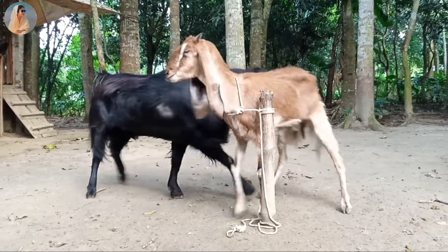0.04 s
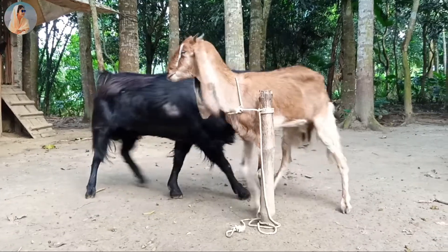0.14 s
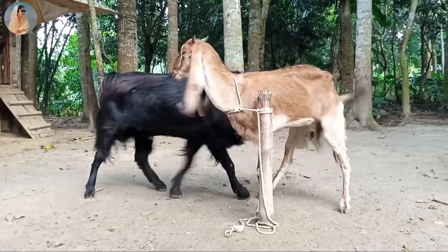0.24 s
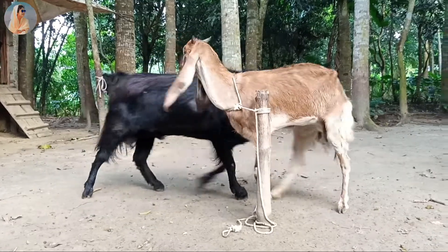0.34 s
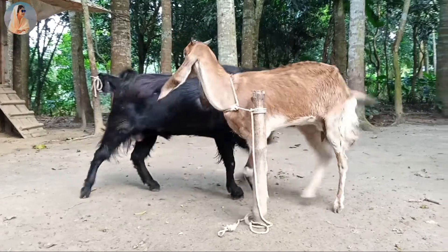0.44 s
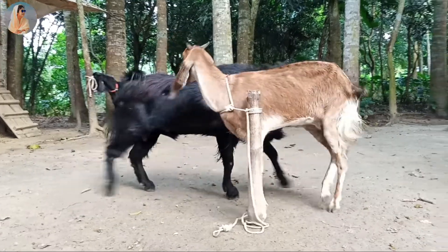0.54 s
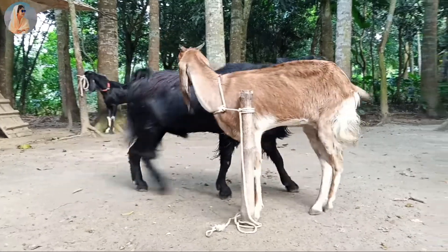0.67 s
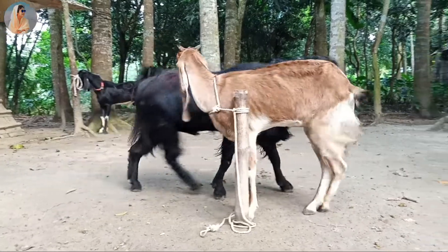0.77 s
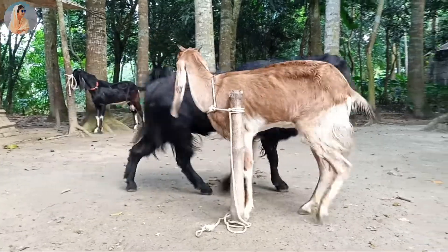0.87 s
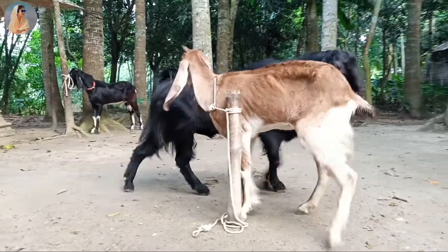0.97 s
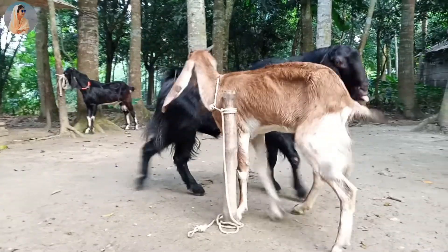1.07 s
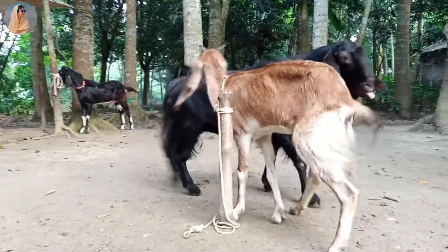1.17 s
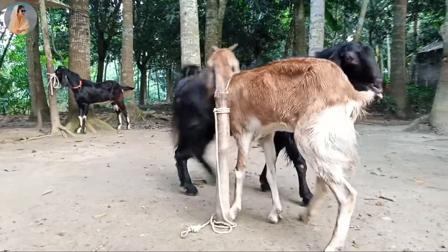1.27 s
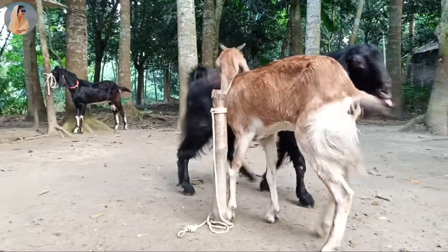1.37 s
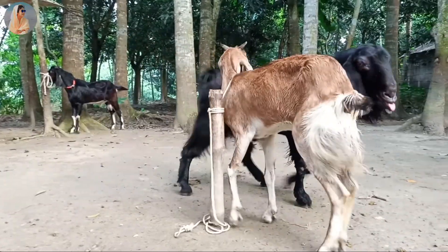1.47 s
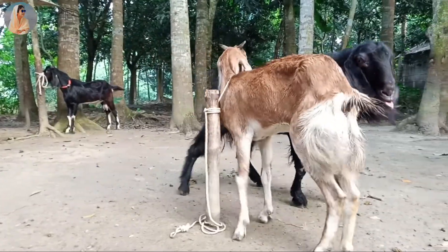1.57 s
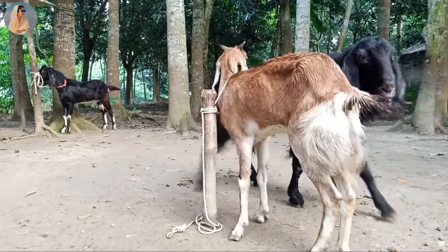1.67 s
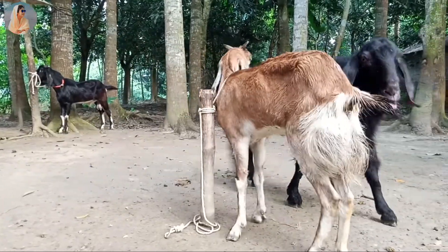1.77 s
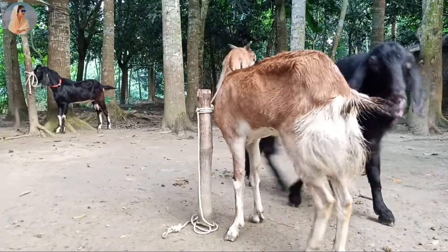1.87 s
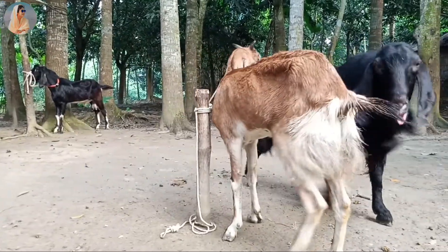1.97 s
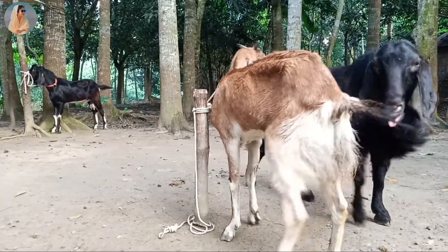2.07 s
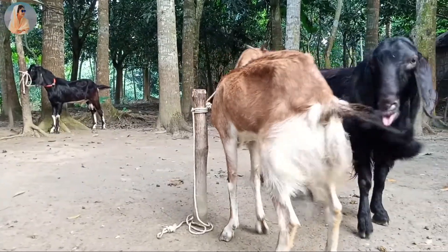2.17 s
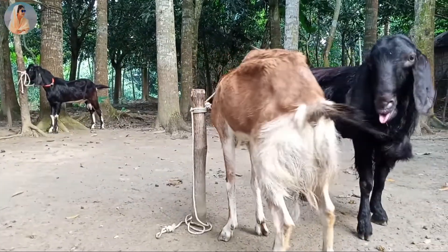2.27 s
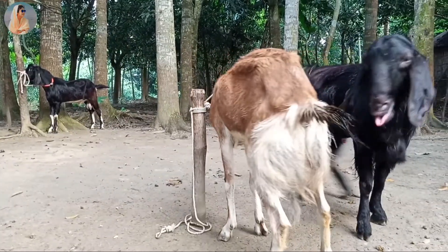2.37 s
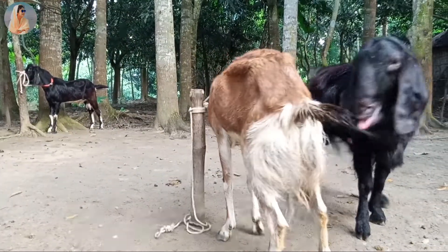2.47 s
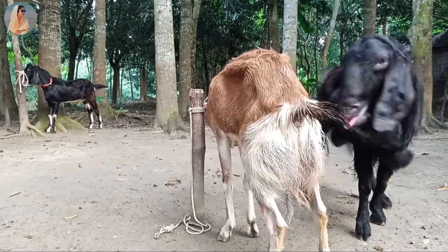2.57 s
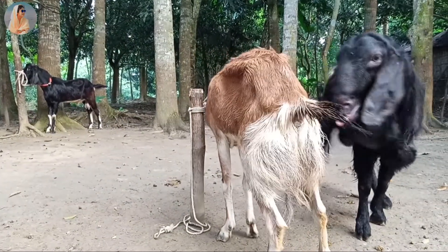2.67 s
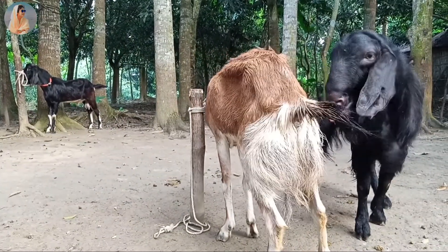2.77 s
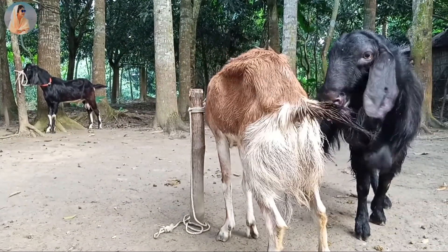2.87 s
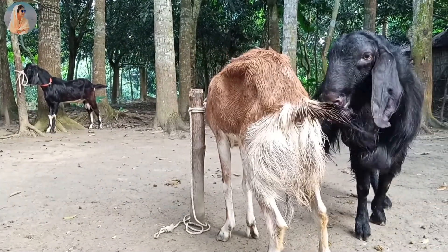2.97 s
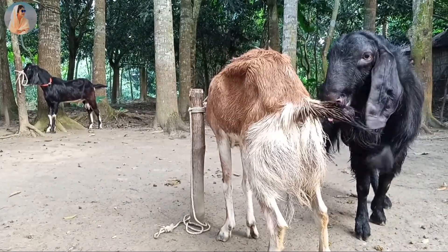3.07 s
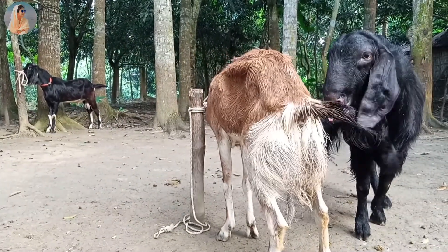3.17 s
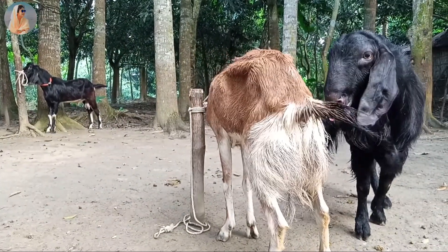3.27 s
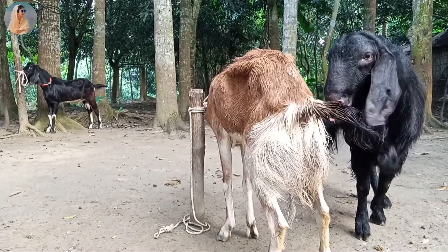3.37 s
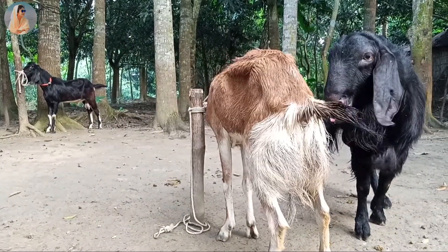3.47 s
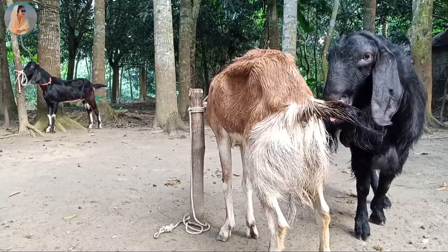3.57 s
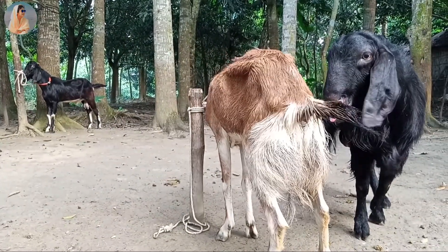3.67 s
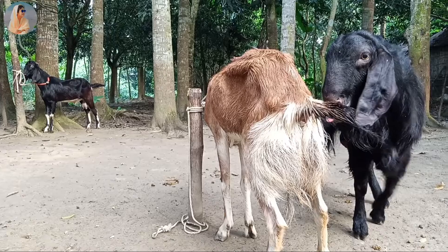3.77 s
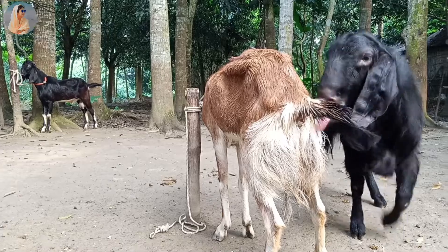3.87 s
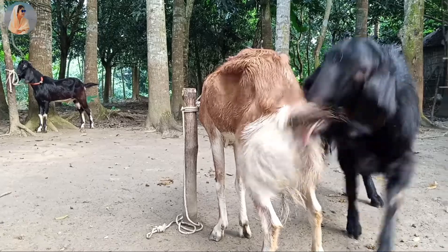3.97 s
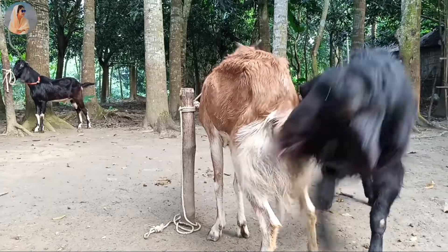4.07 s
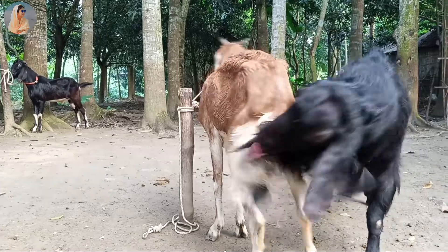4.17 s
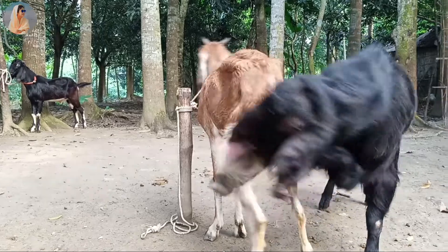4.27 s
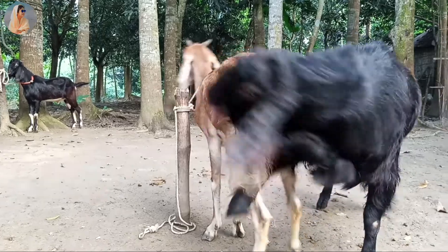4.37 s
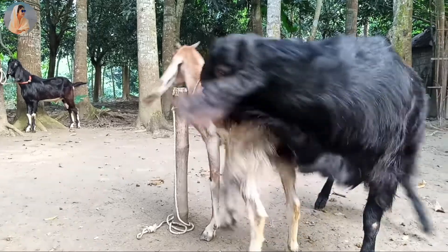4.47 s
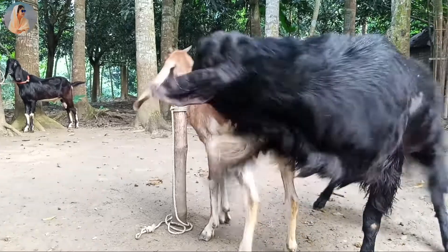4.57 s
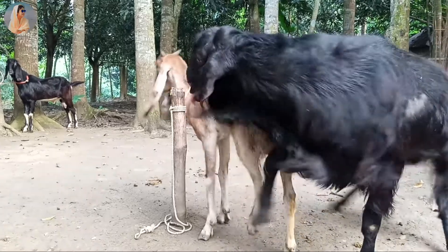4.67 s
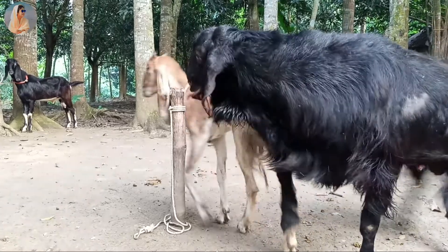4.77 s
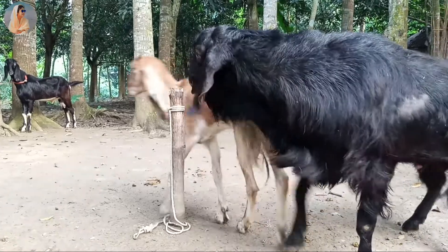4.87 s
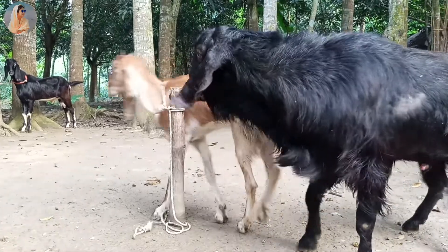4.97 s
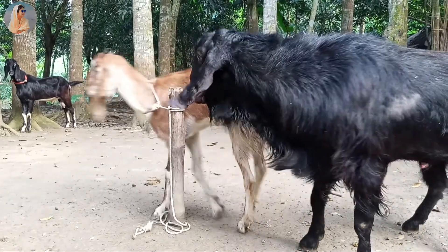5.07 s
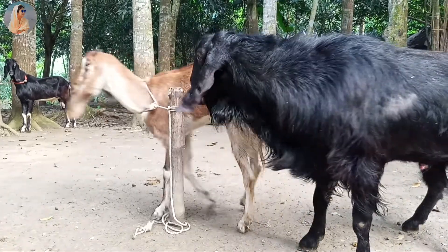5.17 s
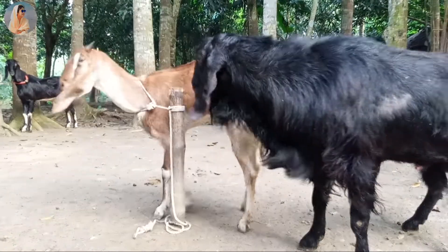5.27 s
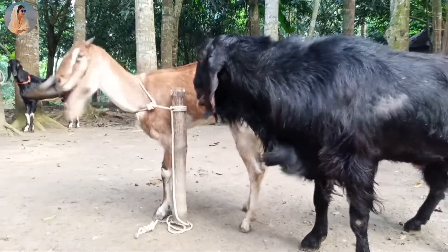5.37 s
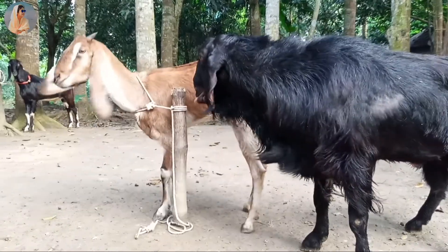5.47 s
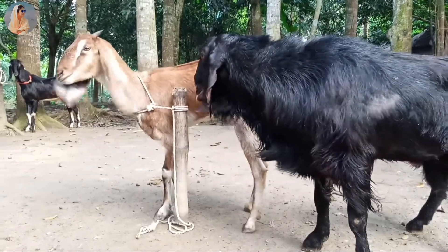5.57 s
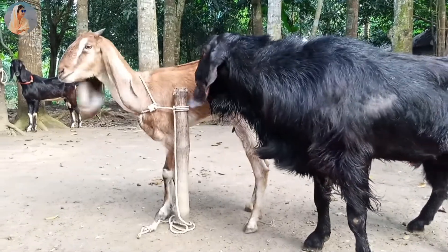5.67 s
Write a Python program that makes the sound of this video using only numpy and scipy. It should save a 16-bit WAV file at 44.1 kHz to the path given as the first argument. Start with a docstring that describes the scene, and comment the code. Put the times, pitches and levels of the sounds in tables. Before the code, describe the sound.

An open earth yard among trees, heard from close to a buck goat. Faint distant air, a low lumpy breeze and a thin steady insect hiss lie underneath, while small birds whistle short downward slurs throughout, with a cluster of lower notes and coos around 0.8-1.3 s. Hooves tick sharply on grit at 0.36 and 1.44 s, scuff at 0.85 and 1.3, and thud near 1.95. The buck snorts softly at 1.0, more strongly at 1.3 and 2.65, then again at 3.05 with a hissing sniff. A longer sniff builds from 3.4 to 3.8 with a faint two-toned nasal wheeze. After a puff and stamping at 4.0-4.2, he blurts a loud, low, wet, blubbering bleat from 4.1 to 4.6, its three strongest pulses between 4.24 and 4.47, closing into a muffled hum. A soft huff follows at 4.7; then light gritty ticks and birdsong until 5.7.

```python
"""An earth yard among trees, where a buck courts a doe close to the microphone.
He snorts and sniffs: noise through nostril resonances. Then he bleats a few short, blubbering
syllables: loose flaps popping the mouth, a chest hum and a throat rung by wet slaps.
Hooves tick, thud and scuff as bursts of noise and grains; small birds whistle on gliding sines.
Behind them lie patchy air, a lumpy breeze and the thin treble of insects, all shaped from noise."""
import sys
import numpy as np
from scipy import signal
from scipy.fft import rfft, irfft
from scipy.io import wavfile
from scipy.ndimage import uniform_filter1d

SR = 44100
rng = np.random.default_rng(int(sys.argv[2]) if len(sys.argv) > 2 else 0)


def int16_out(signal):
    """Quantize to a 16-bit WAV file."""
    q = np.round(np.clip(np.atleast_2d(signal).T, -1, 1) * 32767)
    wavfile.write(sys.argv[1], SR, q.astype(np.int16))


N = 252693
TIME = np.arange(N) / SR


def amp(db):
    """Decibels to gain."""
    return 10 ** (np.asarray(db) / 20)


def unit(x):
    """Scales to rms 1."""
    return x / np.sqrt(np.mean(x ** 2) + 1e-20)


def read(points, hz):
    """Reads a curve of (Hz, value) points on a log-frequency axis."""
    f, value = np.transpose(points)
    return np.interp(np.log(hz + 1), np.log(f + 1), value)


def add(mix, s, sound):
    """Mixes a sound in at s seconds."""
    part = mix[max(round(s * SR), 0):][:len(sound)]
    part += sound[:len(part)]


def colour(x, points):
    """Gives x a spectrum, at rms 1."""
    gain = amp(read(points, np.fft.rfftfreq(len(x), 1 / SR)))
    return unit(irfft(rfft(x) * gain, len(x)))


def drift(size, hz):
    """Random wander of rms 1 that fades out above hz; it repeats each second."""
    rolloff = 1 + (np.fft.rfftfreq(SR, 1 / SR) / hz) ** 4
    wander = unit(irfft(rfft(rng.standard_normal(SR)) / rolloff, SR))
    return wander[np.arange(size) % SR]


def resonate(x, hz, width):
    """A resonance of gain 1 that can follow a pitch curve: x is turned down to 0 Hz, smoothed, turned back."""
    turn = np.exp(2j * np.pi * np.cumsum(hz * np.ones(len(x))) / SR)
    r = np.exp(-np.pi * width / SR)
    return 2 * (turn * signal.lfilter([1 - r], [1, -r], x / turn + 1e-18)).real


def through(x, modes):
    """Passes x through side-by-side resonances, each doubled to steepen its skirts."""
    return sum(amp(db) * resonate(resonate(x, hz, 0.89 * width), hz, 0.81 * width)
               for hz, width, db in modes)


def band(x, hz, spread, order=2):
    """Band-pass from hz / spread to hz * spread."""
    sos = signal.butter(order, [hz / spread, hz * spread], "band", fs=SR, output="sos")
    return signal.sosfilt(sos, x)


def swell(start, rise, fall):
    """A firm start that rounds off at full strength, then a bell-shaped fall."""
    t = TIME - start
    attack = np.sin(np.pi / 2 * np.clip(t / rise, 0, 1)) ** 0.94
    return attack * np.exp(-(np.maximum(t - rise, 0) / fall) ** 2)


def knocks(rows, spread):
    """Each contact is a burst of band-passed noise with a quick onset and an exponential decay."""
    out, t = np.zeros(N), np.arange(SR // 3) / SR
    for s, db, hz, decay in rows:
        burst = unit(band(rng.standard_normal(len(t)), hz, spread))
        add(out, s, amp(db) * burst * np.exp(-t / decay) * (1 - np.exp(-t * hz)))
    return out


def distant_air():
    """A faint wash from afar: coloured noise whose level is patchy in both time and pitch."""
    # Spectrum of the wash. Each row: frequency in Hz, relative level in dB.
    air_colour = [(18, -51.5), (30, 4.5), (98, 4), (508, -6.5), (928, -6), (2320, -16), (3530, -12.5),
                  (4350, -7.5), (7350, -20), (8160, -12), (9060, -20.5), (10300, -19.5), (11800, -28.5),
                  (13400, -22.5), (15700, -24)]
    hz, _, z = signal.stft(colour(rng.standard_normal(N), air_colour), SR, nperseg=2048, noverlap=1536)
    patches = uniform_filter1d(rng.standard_normal(z.shape), size=5, axis=0)
    patches = unit(uniform_filter1d(patches, size=10, axis=1))
    # Depth of the patches: (Hz, dB)
    depth_db = read([(100, 4.4), (500, 5.3), (2500, 7.06), (7000, 4.9), (12000, 2.6)], hz)[:, None]
    patchy = signal.istft(z * amp(depth_db * patches), SR, nperseg=2048, noverlap=1536)[1][:N]
    return amp(-65) * unit(patchy) * amp(1.3 * drift(N, 6))


def breeze():
    """A low rumble of band-passed noise: a slow swell with random lumps."""
    # The slow swell before the lumps. Each row: time in seconds, level in dB.
    breeze_level = [(0, -73.5), (.9, -69.5), (2.1, -76.5), (3.4, -79.5), (4.3, -67.5), (5.73, -83.5)]
    gust_db, gust_hz = -6, 2.1  # depth of the lumps, and the rate above which they fade out
    rumble = unit(band(rng.standard_normal(N), 115, 1.735, order=3))
    return rumble * amp(np.interp(TIME, *np.transpose(breeze_level)) + gust_db * drift(N, gust_hz))


def insects():
    """Steady narrow bands of noise in the treble, and a higher one whose level flickers unevenly."""
    # The steady bands. Each row: centre in Hz, width in Hz of each of two passes, level in dB.
    insect_bands = [(8060, 43.9, -71.5), (8180, 75, -74.5), (8410, 123.4, -75.5)]
    rasper_hz, rasper_width_hz, rasper_db = 10160, 1400, -77
    pulse_db, pulse_hz = 3, 45  # depth of the flicker, and the rate above which it fades out
    trill = np.zeros(N)
    for hz, width, db in insect_bands:
        trill += amp(db) * unit(resonate(resonate(rng.standard_normal(N), hz, width), hz, width))
    rasper = through(rng.standard_normal(N), [(rasper_hz, rasper_width_hz, 0)])
    return trill + amp(rasper_db) * unit(rasper * amp(pulse_db * drift(N, pulse_hz)))


def grove():
    """The backdrop: distant air, breeze and insects, all filtered noise."""
    return distant_air() + breeze() + insects()


def hooves():
    """Snaps, thuds and clumped, grainy scuffs on dry earth."""
    # Hooves and bodies thudding. Each row: start in seconds, relative level in dB, centre in Hz,
    # decay in seconds.
    thuds = [(.03, -77.5, 730, 0.057), (.235, -55, 244, 0.0049), (1.045, -55.5, 1320, 0.0067),
             (1.36, -62.5, 126, 0.03), (1.86, -60.5, 99, 0.024), (1.955, -46.5, 117, 0.0053),
             (2.225, -61.5, 90, 0.026), (2.68, -67.5, 135, 0.045), (3.755, -66.5, 404, 0.011),
             (4.075, -61, 1290, 0.0068), (4.152, -49, 118, 0.016), (4.21, -56.5, 114, 0.023),
             (4.172, -49, 443, 0.0048)]
    # Hooves dragged over grit. Each row: start in seconds, rise and fall in seconds, level in dB.
    scuffs = [(.84, 0.088, 0.23, -62), (1.31, 0.11, 0.21, -56), (1.983, 0.0031, 0.034, -54),
              (2.1, 0.051, 0.28, -67.5), (2.71, 0.023, 0.39, -64.5), (4.03, 0.041, 0.039, -59.5),
              (4.45, 0.026, 0.094, -56), (4.68, .14, 0.034, -59)]
    # Spectrum of the scuffs. Each row: frequency in Hz, relative level in dB.
    scuff_colour = [(180, -44), (400, -26), (1000, -2.5), (1850, -0.5), (2820, -5.5), (4120, 0.5),
                    (6500, -6), (10000, -14), (12500, -19.5), (15000, -22)]
    # Snaps of grit and twigs under hooves. Each row: start in seconds, relative level in dB, centre in Hz.
    ticks = [(0.3553, -38.5, 6640), (0.61, -48, 10000), (1.439, -33.5, 6400), (1.487, -58, 6800),
             (1.986, -38, 5800), (2.136, -44, 4470), (2.743, -40, 8400), (3.8772, -42, 6860),
             (3.9608, -41.5, 7000), (4.1123, -40.5, 6800), (4.579, -40, 7630), (4.833, -40, 9000),
             (4.903, -43, 7500), (5.2015, -37.5, 7760)]
    tick_decay_s = 0.003
    grains = (rng.random(N) < 900 / SR) * rng.choice([-1., 1.], N)  # about 900 a second
    grains = grains * amp(2.1 * np.minimum(rng.exponential(1, N), 4))
    grit = (grains + 0.28 * rng.standard_normal(N)) * amp(2.74 * drift(N, 32.04))
    drag = sum(amp(db) * swell(start, rise, fall) for start, rise, fall, db in scuffs)
    snaps = [(s, db, hz, tick_decay_s) for s, db, hz in ticks]
    return amp(13.5) * knocks(thuds, 1.35) + colour(grit, scuff_colour) * drag + amp(-5) * knocks(snaps, 1.7)


def tone(hz, flutter):
    """A fluttering whistle along a pitch curve, uneven in strength."""
    phase = 2 * np.pi * np.cumsum(hz * (1 + flutter * drift(len(hz), 260))) / SR
    return unit(amp(3.9 * drift(len(hz), 45)) * np.sin(phase))


def slur(s, db, hz, glide, drop, flutter):
    """A whistle with a soft held start, then a fall that begins at s and gains a buzz."""
    hold_s, fall_s = .11, .09
    buzz = .04  # flutter gained during the fall, as a share of the pitch
    t = np.arange(-hold_s, fall_s, 1 / SR)
    held, fallen = np.maximum(-t / hold_s, 0), np.maximum(t / fall_s, 0)
    pitch = 1 - glide * held - drop * fallen ** 0.82
    shape = amp(-11 * held ** 0.98 - 11 * fallen ** 2) * signal.windows.tukey(len(t), .2)
    return s + t[0], amp(db) * shape * tone(hz * pitch, flutter + buzz * fallen)


def note(s, db, hz, length, glide, flutter):
    """A short note that glides up or down from hz."""
    u = np.linspace(0, 1, round(length * SR))
    return s, amp(db) * signal.windows.tukey(len(u), .4) * tone(hz * (1 + glide * u), flutter)


def birds():
    """Overlapping whistles and notes; the more a call flutters, the more leaves and trunks smear it."""
    # Down-slurred whistles of small birds. Each row: start of the fall in seconds, relative level in dB,
    # pitch there in Hz, then as shares of that pitch: glide while held, drop, flutter.
    whistles = [(0.229, -61.5, 4250, .03, 0.15, 0.051), (0.399, -66, 3710, -.04, 0.27, 0.047),
                (.55, -61.5, 4236, .03, 0.16, 0.055), (.66, -71, 3760, -.02, 0.28, 0.0494),
                (1.092, -60.5, 4990, -.04, 0.27, .04), (1.7, -62.5, 5100, -.02, 0.21, 0.0079),
                (1.798, -65.5, 4520, 0, .2, 0.056), (2.118, -60, 4840, -.02, 0.12, 0.043),
                (2.2, -65, 4190, -.04, 0.14, .04), (2.42, -67, 4170, -0.045, 0.09, .011),
                (2.535, -60, 5170, .035, 0.16, 0.0077), (2.75, -60, 4280, -.03, 0.2, 0.05),
                (2.95, -56.5, 5200, .035, 0.14, 0.013), (3.08, -60.5, 4460, -.04, .22, 0.0095),
                (3.387, -57, 5200, 0, 0.17, 0.0096), (3.47, -64, 4370, -.06, .14, 0.0094),
                (3.851, -68, 4330, .02, 0.15, 0.0089), (3.941, -55, 5270, .01, .2, 0.0089),
                (4.48, -60, 5140, .02, .2, 0.027), (4.901, -67.5, 5020, 0, 0.19, 0.018),
                (5, -62, 5360, 0, 0.21, 0.019), (5.114, -64, 4200, -.14, 0.18, 0.0078),
                (5.365, -61, 4880, -.05, 0.19, 0.0087), (5.346, -62, 4600, 0, 0.21, 0.0058),
                (5.665, -62, 4520, -.035, 0.22, 0.0085)]
    # Short bird notes and coos; those near 3.1 kHz answer the lower whistles.
    # Each row: start in seconds, relative level in dB, first pitch in Hz, length in seconds,
    # then as shares of the pitch: glide, flutter.
    notes = [(0.346, -69, 3180, 0.14, -0.12, 0.044), (.68, -68, 3160, 0.096, -0.072, 0.05),
             (0.771, -60, 3896, 0.13, 0.16, 0.075), (0.873, -59.5, 6490, 0.1, -0.013, 0.013),
             (.87, -64, 1900, 0.095, -0.029, 0.011), (0.876, -61, 3880, 0.087, -0.051, 0.03),
             (.93, -66, 500.6, .22, -0.043, 0.047), (0.995, -68.5, 3005, 0.11, -0.016, 0.048),
             (1.11, -63, 1486, 0.13, -0.022, 0.0081), (1.116, -65.5, 2000, 0.088, -0.073, 0.046),
             (1.109, -66.5, 956, 0.053, -0.054, 0.036), (1.208, -66, 1155, 0.12, -0.13, 0.024),
             (1.24, -63.5, 501, 0.093, -0.0078, 0.012), (1.268, -63.5, 2614, 0.108, -0.034, 0.017),
             (1.569, -66.5, 6500, 0.031, -0.034, 0.016), (1.667, -66.5, 3110, 0.09, .02, 0.027),
             (2.029, -68, 3190, 0.072, -0.02, 0.034), (2.919, -60, 5730, 0.043, 0.0066, 0.01),
             (4.99, -64, 6090, 0.03, -0.03, .01), (5.38, -71, 3190, 0.13, 0.079, 0.03)]
    clear, hazy = np.zeros(N), np.zeros(N)
    for voice, rows in ((slur, whistles), (note, notes)):
        for row in rows:
            s, call = voice(*row)
            flutter = row[-1]
            haze = np.clip(flutter / 0.025, 0, .8)  # share of the call's power that is smeared
            add(clear, s, np.sqrt(1 - haze) * call)
            add(hazy, s, np.sqrt(haze) * call)
    return clear + amp(0.5) * nearby(hazy, decay=0.029)


def snorts():
    """Fluttering air through the buck's nostrils, whose resonance moves and broadens as they tighten."""
    # Each row: start in seconds, rise and fall in seconds, relative level in dB,
    # nostril resonance in Hz when slack, then when tight.
    snort_rows = [(.981, 0.032, 0.063, -54, 1100, 1420), (1.264, 0.099, 0.076, -46.5, 1350, 1840),
                  (2.625, 0.064, 0.089, -46, 1324, 1885), (3.038, 0.089, 0.039, -51.5, 1370, 1625),
                  (3.45, 0.07, 0.064, -61.5, 1460, 1760), (3.8, 0.087, 0.1, -57.5, 1770, 1780)]
    # Narrow fixed resonances that streak the snort, as a bounce off the ground would,
    # lit as the nostril resonance sweeps past.
    # Each row: centre in Hz, width setting in Hz, relative level in dB.
    streaks = [(1422, 40, 3), (1679, 79, -1), (1835, 56, 5.5), (2020, 43, -2.5), (2305, 34, 4)]
    streaks_db = -3  # against the plain rush of air
    tighten_s = .11
    slack_width_hz, tight_width_hz = 230, 580  # width settings: broader as the air speeds up
    out = np.zeros(N)
    for start, rise, fall, db, slack_hz, tight_hz in snort_rows:
        part = slice(round(start * SR), round((start + 0.47) * SR))
        tight = np.clip((TIME[part] - start) / tighten_s, 0, 1)
        hz = slack_hz + (tight_hz - slack_hz) * tight
        air = rng.standard_normal(len(hz)) * amp(0.83 * drift(len(hz), 73))
        slack_jet = unit(through(air, [(hz, slack_width_hz, 0)]))
        tight_jet = unit(through(air, [(hz, tight_width_hz, 0)]))
        jet = (1 - tight) * slack_jet + tight * tight_jet
        streaked = unit(band(jet, 1810, 1.6, order=3)) + amp(streaks_db) * unit(through(jet, streaks))
        steady = streaked / np.sqrt(uniform_filter1d(streaked ** 2, SR // 20))  # even out the level over 50 ms
        out[part] += amp(db) * steady * swell(start, rise, fall)[part]
    return out


def sniffs():
    """Long hissing sniffs: unsteady air through fixed resonances of the nose."""
    # Each row: start in seconds, rise and fall in seconds, relative level in dB.
    sniff_rows = [(3.037, 0.12, 0.058, -56.5), (3.42, 0.37, 0.081, -57.5)]
    # One set of nose resonances a sniff. Each row: centre in Hz, width setting in Hz, relative level in dB.
    nose_modes = [
        [(3170, 420, 1.5), (4370, 1400, -4.5), (5620, 610, 1.5), (6370, 450, 0.5), (8600, 2000, -9.5)],
        [(4277, 100, -7.5), (5400, 1050, -11.5), (6800, 110, -13.5)],
    ]
    out = np.zeros(N)
    for (start, rise, fall, db), modes in zip(sniff_rows, nose_modes):
        part = slice(round(start * SR), round((start + 1.1) * SR))
        air = rng.standard_normal(len(TIME[part]))
        hiss = amp(db + 2 * drift(len(air), 30)) * unit(through(air, modes))
        out[part] += hiss * swell(start, rise, fall)[part]
    return out


def wheeze():
    """Two breathy, unsteady tones that sing in the nose during the long sniff: noise in narrow resonances."""
    # Each row: time in seconds, low tone in Hz, its relative level in dB, high tone in Hz, its level in dB.
    wheeze_path = [(3.43, 1050, -88, 2130, -90), (3.47, 1028, -62.5, 2100, -69),
                   (3.551, 936, -70.5, 2010, -65), (3.68, 916, -63, 2107, -65), (3.79, 860, -92, 2210, -65),
                   (3.889, 770, -63, 2140, -65.5), (3.95, 790, -89, 2210, -71)]
    low_width_hz, high_width_hz = 76, 180  # width settings: the high tone is the breathier
    waver = .015  # share of the pitch
    out = np.zeros(N)
    times, low_hz, low_db, high_hz, high_db = np.transpose(wheeze_path)
    t = np.arange(times[0], times[-1], 1 / SR)
    for hz, db, width in ((low_hz, low_db, low_width_hz), (high_hz, high_db, high_width_hz)):
        pitch = np.interp(t, times, hz) * (1 + waver * drift(len(t), 25))
        breath = unit(through(rng.standard_normal(len(t)), [(pitch, width, 0)]))
        add(out, times[0], amp(np.interp(t, times, db)) * breath)
    return out


def huffs():
    """Soft, uneven puffs of air through the open mouth's resonances."""
    # Puffs around the bleat. Each row: start in seconds, rise and fall in seconds, relative level in dB.
    huff_rows = [(3.974, 0.019, 0.068, -53.5), (4.705, 0.056, 0.064, -56.5)]
    # The open mouth. Each row: centre in Hz, width setting in Hz, relative level in dB.
    huff_modes = [(632, 220, 5), (836, 140, 2.5), (1340, 380, -6), (2170, 280, -9.5)]
    air = through(rng.standard_normal(N), huff_modes)
    puffs = sum(amp(db) * swell(start, rise, fall) for start, rise, fall, db in huff_rows)
    return unit(air * amp(1.1 * drift(N, 45))) * puffs


def beats(turns):
    """One click at each whole turn."""
    return np.diff(np.floor(np.maximum.accumulate(turns)), prepend=np.floor(turns[0]))


def pop(hz):
    """One flap: the mouth's resonance swells and rises as the lips part, and is damped as they meet."""
    length_s, glide = .0098, 0.38  # glide: rise over the flap as a share of the pitch
    u = np.linspace(0, 1, round(length_s * SR))
    return np.sin(np.pi * u) * np.sin(2 * np.pi * np.cumsum(hz * (1 + glide * (u - .5))) / SR)


def rattle(size):
    """Wet tissue rattling: sharp strikes at uneven intervals, at rms 1."""
    per_s = 420  # typical rate
    turns = np.cumsum(per_s * np.exp(.5 * drift(size, 200))) / SR
    return unit(np.diff(np.floor(turns), prepend=0) * amp(1.1 * rng.standard_normal(size)))


def loudest(x):
    """Scales x so that its loudest 20 ms has rms 1."""
    return x / np.sqrt(uniform_filter1d(x ** 2, SR // 50).max())


def syllable(peak, rise, fall, flap_hz, hum_hz, mouth_db, mouth_hz, hum_db, rasp_db, top_hz, throat, nasal_db):
    """A few loose flaps pop the mouth open over a hum in the chest; wet slaps in each flap ring the throat."""
    # Tongue and lips slap twice in each flap. Each row: lag as a share of the flap, relative level in dB.
    slap_rows = [(0.171, -3.5), (.53, 0)]
    # Throat resonances that colour the rasp, before the shift in pitch.
    # Each row: centre in Hz, width setting in Hz, relative level in dB.
    throat_modes = [(1753, 500, -1), (2457, 560, -1), (3410, 590, 7.5), (3756, 240, 5), (5140, 370, 7),
                    (8800, 2600, -8.5), (13800, 4600, -21)]
    slap_jitter = .04  # unevenness, as a share of a flap
    spatter_s, spatter_db, rattle_db = .0012, -8, -9  # spray after each slap, and a faint rattle
    throat_lift, throat_wobble = 0.03, 0.007  # rise with effort and tremble, as shares of the pitch
    t = np.arange(-round(0.04 * SR), round(.09 * SR)) / SR
    size = len(t)

    def effort(lag):
        """A lopsided bell that peaks lag seconds after the syllable's peak."""
        return np.exp(-(np.where(t < lag, (t - lag) / rise, (t - lag) / fall)) ** 2)

    turns = flap_hz * t + 0.02 * drift(size, 70.35) * np.minimum(abs(t) * flap_hz, 1)
    flaps = beats(turns) * effort(0)
    mouth = loudest(signal.fftconvolve(flaps, pop(mouth_hz))[:size])
    mouth += amp(-11.0) * loudest(band(flaps, 860, 1.085))
    mouth += amp(-11.5) * loudest(band(flaps, 539, 1.09))
    mouth += amp(-19.5) * loudest(band(flaps, 395, 1.09))
    mouth = signal.sosfilt(signal.butter(4, 1150, fs=SR, output="sos"), mouth)  # half-closed lips muffle it

    hum = 2 * np.pi * (hum_hz * t + 0.082 * drift(size, 60))
    chest = np.sin(hum) + amp(-11.5) * np.sin(hum / 2) + amp(-15) * np.sin(2 * hum)
    chest = loudest(chest * effort(0.0018))
    chest += amp(-14.0) * loudest(resonate(resonate(chest, 217, 22), 229, 60))  # the chest rings on briefly
    chest += amp(nasal_db) * loudest(band(flaps, 1195, 1.05))  # the nose rings too

    slaps = np.zeros(size)
    for lag, db in slap_rows:
        slaps += amp(db) * beats(turns - lag + slap_jitter * drift(size, 110))
    spray = signal.lfilter([1], [1, -np.exp(-1 / (spatter_s * SR))], slaps)
    spatter = unit(spray * rng.standard_normal(size))
    strikes = unit(slaps) + amp(spatter_db) * spatter + amp(rattle_db) * rattle(size)
    shift = throat * (1 + throat_lift * (effort(0.0099) - .7) + throat_wobble * drift(size, 90))
    shifted_modes = [(hz * shift, width, db) for hz, width, db in throat_modes]
    # The upper resonances speak mainly near full effort
    rasp = loudest(through(strikes * effort(0.0074) ** 2, shifted_modes))
    rasp += amp(-9.5) * loudest(band(strikes * effort(0), 1950, 1.78))
    rasp = loudest(signal.sosfilt(signal.butter(8, top_hz, fs=SR, output="sos"), rasp))
    return peak + t[0], amp(mouth_db) * mouth + amp(hum_db) * chest + amp(rasp_db) * rasp


def bleat():
    """The buck's run of syllables: opening the mouth brightens them, louder ones are rougher."""
    # Each row: peak of the effort in seconds, rise and fall in seconds, flap rate in Hz, hum pitch in Hz,
    # mouth level in dB, chest hum level in dB, mouth opening from 0 to 1, throat pitch as a ratio,
    # extra rasp in dB.
    syllables = [(4.117, .002, 0.013, 95, 192, -47.5, -55.5, 1, 0.94, 2.5),
                 (4.143, 0.00063, 0.0063, 90, 165, -38.5, -42, 0.04, 0.94, -4),
                 (4.2368, 0.0021, 0.013, 91.7, 206, -23, -33, 0.86, 0.99, 2.5),
                 (4.349, 0.01, 0.018, 80.55, 198.8, -22, -27.5, .95, 1.01, 0.5),
                 (4.4669, 0.018, .0095, 90.55, 194.7, -23, -26.5, 0.23, 0.956, 0.5),
                 (4.5666, 0.012, 0.018, 88.6, 176.4, -37.5, -26, 0.02, 0.91, -2),
                 (4.672, 0.0067, 0.022, 95.2, 176, -48.5, -52, 0.9, 1.07, -5)]
    shut_hz, open_hz = 567, 713  # the mouth's resonance rises as it opens
    rasp_shut_hz, rasp_open_hz = 2890, 14100  # and lets out more of the rasp's treble
    full_db, full_rasp_db, rasp_growth = -21.5, -30.5, 1.04  # the rasp grows faster than the voice
    nasal_shut_db, nasal_open_db = -19.5, -34.5  # the nose rings more as the mouth shuts
    out = np.zeros(N)
    for peak, rise, fall, flap_hz, hum_hz, mouth_db, hum_db, opening, throat, bite_db in syllables:
        mouth_hz = shut_hz + (open_hz - shut_hz) * opening
        top_hz = rasp_shut_hz * (rasp_open_hz / rasp_shut_hz) ** opening
        rasp_db = full_rasp_db + bite_db + rasp_growth * ((mouth_db + hum_db) / 2 - full_db)
        nasal_db = nasal_shut_db + (nasal_open_db - nasal_shut_db) * opening
        add(out, *syllable(peak, rise, fall, flap_hz, hum_hz, mouth_db, mouth_hz, hum_db,
                           rasp_db, top_hz, throat, nasal_db))
    return out


def smacks():
    """Lips and tongue part with short wet clicks; the higher the click, the more spray goes with it."""
    # Wet smacks among the syllables. Each row: start in seconds, relative level in dB, centre in Hz.
    smack_rows = [(4.146, -35.5, 3940), (4.267, -33.5, 3600), (4.3361, -39, 1500), (4.431, -41, 1720),
                  (4.434, -45, 5900), (4.4455, -42, 1100)]
    decay_cycles, typical_hz = 11.9, 4200
    spit_db, spit_db_per_octave, spit_hz, spit_decay_s = -6.5, 6.5, 12000, 0.0053
    clicks, spray = [], []
    for s, db, hz in smack_rows:
        clicks.append((s, db, hz, decay_cycles / hz))
        spray_db = db + spit_db + spit_db_per_octave * np.log2(hz / typical_hz)
        spray.append((s, spray_db, spit_hz, spit_decay_s))
    return amp(2.0) * (knocks(clicks, 1.63) + knocks(spray, 1.3))


def ground(x, delay=.0073, share=.85):
    """The bounce off the hard earth, a delayed copy, combs the sound."""
    return (x + share * np.interp(TIME - delay, TIME, x, left=0)) / np.hypot(1, share)


def nearby(x, decay=0.021):
    """Quick scattered reflections off things close by: sparse random taps that die exponentially."""
    t = np.arange(SR // 8) / SR
    taps = rng.choice([-1., 1.], len(t)) * (rng.random(len(t)) < 900 / SR)
    taps = taps * (t > .007) * np.exp(-t / decay)
    return signal.fftconvolve(x, taps / np.linalg.norm(taps))[:N]


def yard(x, delay=0.014):
    """Scattered echoes from trunks and sheds, each band dying at its own speed."""
    # Each row: frequency in Hz, time to fall by 60 dB in seconds.
    yard_decay = [(100, 0.22), (250, 0.53), (700, 0.12), (1700, 0.7), (4500, 0.47), (12000, 1)]
    taps = rng.choice([-1., 1.], SR) * (rng.random(SR) < 1800 / SR) * (np.arange(SR) > delay * SR)
    hz, t, z = signal.stft(taps, SR, nperseg=256)
    tail = signal.istft(z * amp(-60 * t / read(yard_decay, hz)[:, None]), SR, nperseg=256)[1]
    return signal.fftconvolve(x, tail / np.linalg.norm(tail))[:N]


def scene():
    """The voice is near and dry; the nose and the birds send more of themselves into the yard's echoes."""
    song = birds()
    contacts = smacks() + hooves()
    nose = ground(snorts() + sniffs() + huffs()) + wheeze()
    voice = bleat()
    direct = voice + amp(-1.0) * nose + contacts + song
    early = nearby(amp(-20) * voice + amp(-9.0) * contacts)
    late = yard(amp(-13.0) * voice + amp(-2.0) * nose + amp(-12) * contacts + amp(-6.5) * song)
    return (direct + early + late + grove())[None]


def record(dry):
    """A small microphone's colour, then the recorder's band limit."""
    # The microphone's response. Each row: frequency in Hz, gain in dB.
    microphone = [(25, -27), (50, -4.5), (80, -1), (10500, 0), (12800, -13), (15200, -0.5)]
    edge_hz = 15800
    heard = irfft(rfft(dry) * amp(read(microphone, np.fft.rfftfreq(N, 1 / SR))), N)
    lowpass = signal.firwin(511, edge_hz, window=("kaiser", 9), fs=SR)
    return signal.oaconvolve(heard, lowpass[None], "same")


dry = scene()
out = record(dry)
int16_out(out)
```